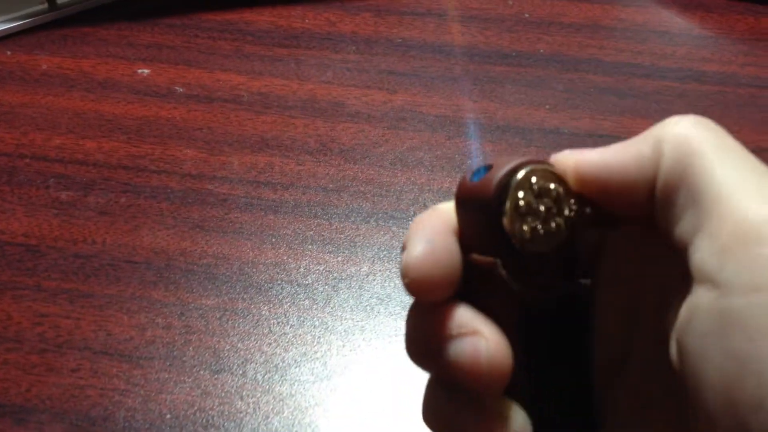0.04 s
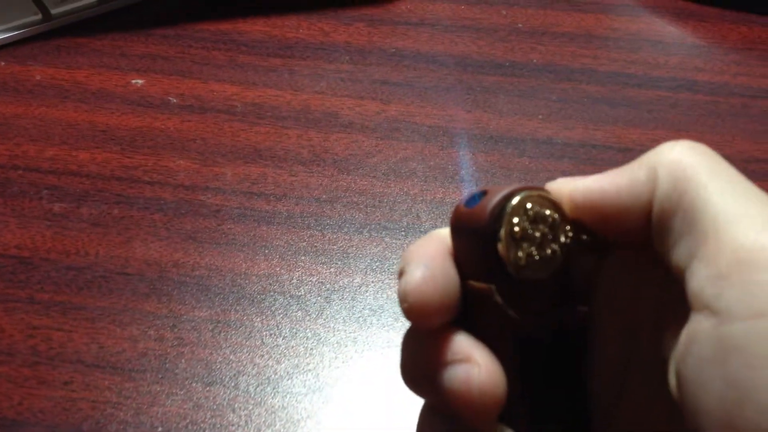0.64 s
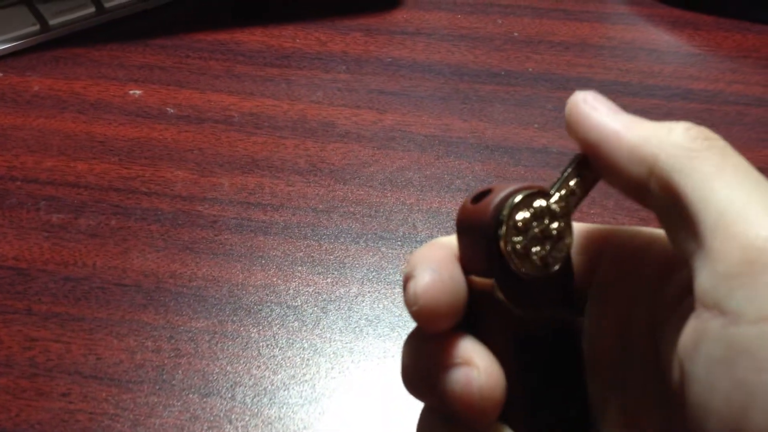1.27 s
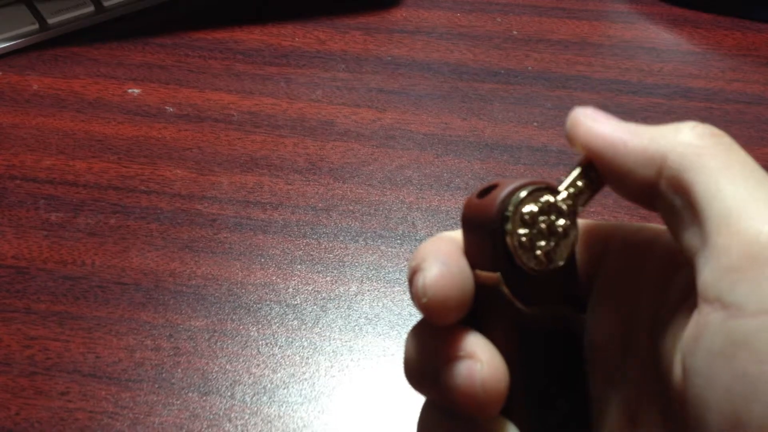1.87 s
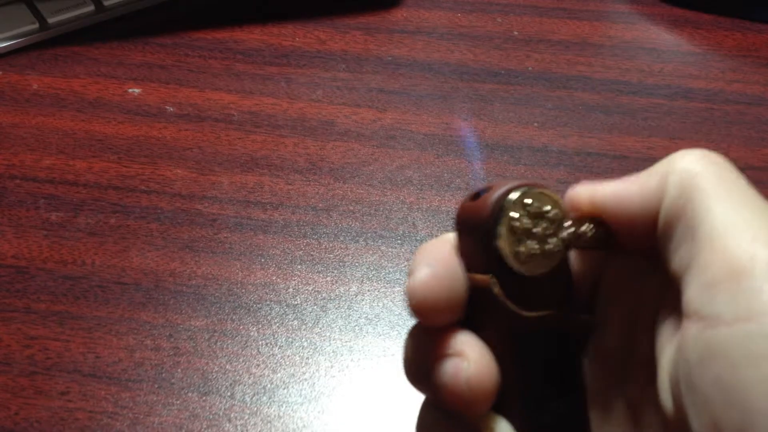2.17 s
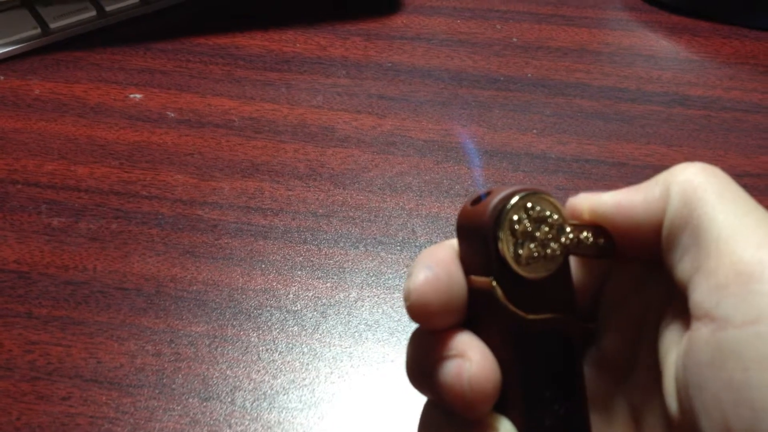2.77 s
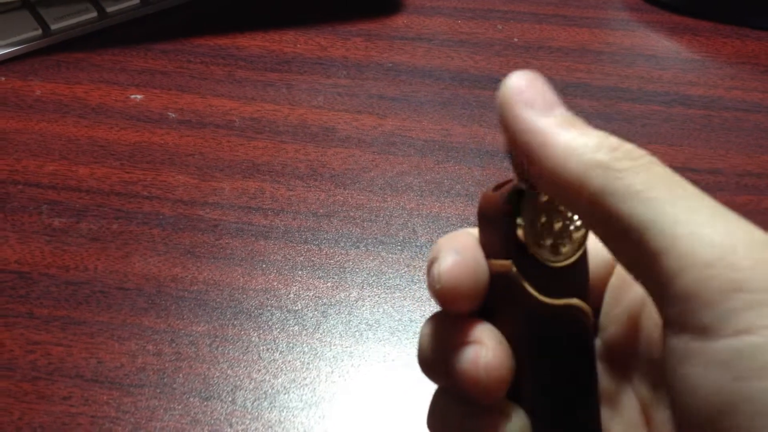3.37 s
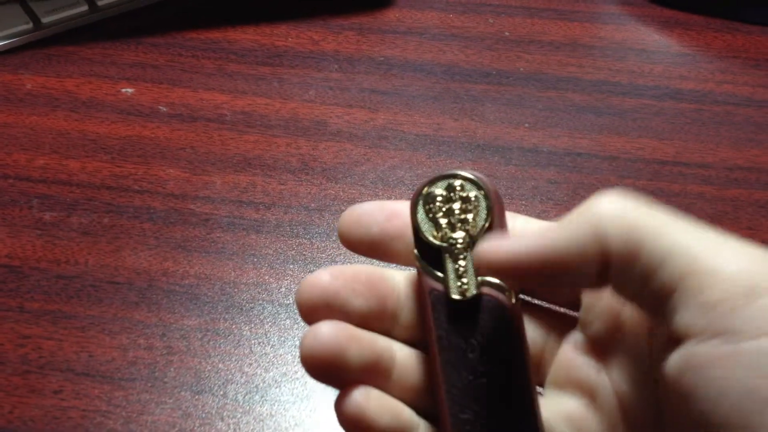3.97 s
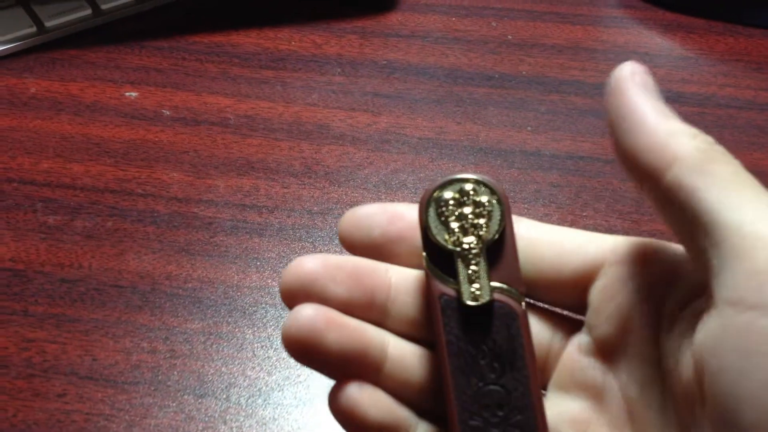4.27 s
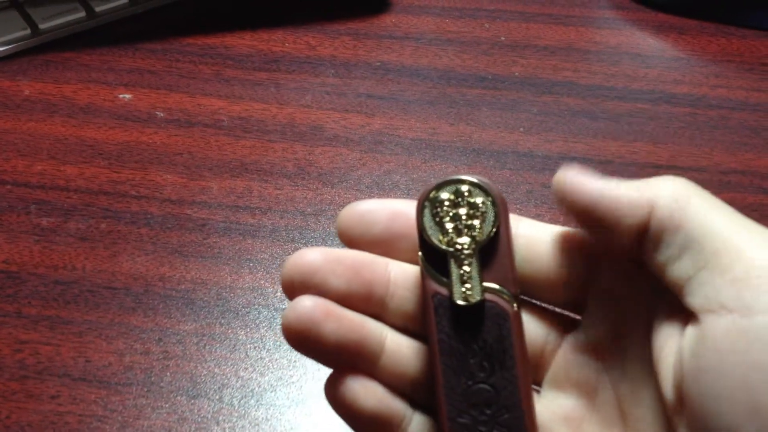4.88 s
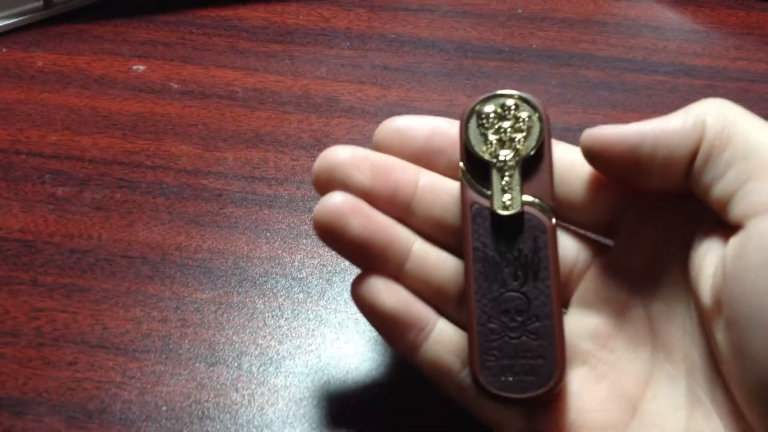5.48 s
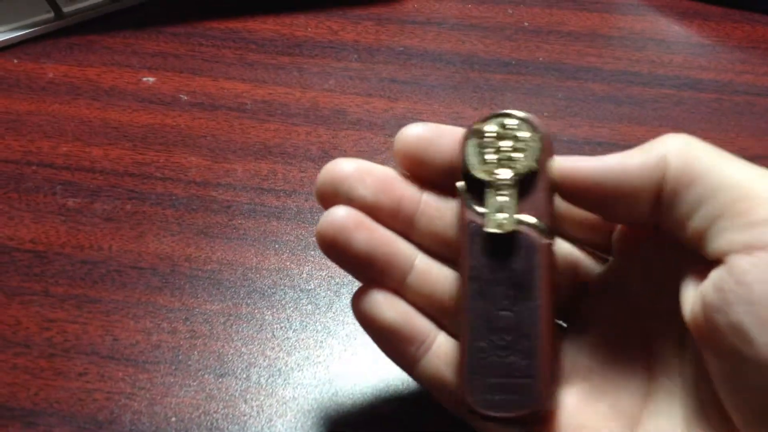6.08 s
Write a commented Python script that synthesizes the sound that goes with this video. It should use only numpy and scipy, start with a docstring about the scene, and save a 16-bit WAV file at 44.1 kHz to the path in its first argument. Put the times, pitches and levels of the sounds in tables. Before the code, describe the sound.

A jet lighter burns with a soft hissing roar, then cuts off with a few small ticks. After a pause, gas hisses briefly, the igniter snaps sharply and the flame returns, louder and slightly crackly. It stops again, and the metal lever ticks as it swings round and clicks shut. The microphone is close, in a small quiet room with faint ventilation noise and electrical hum.

```python
"""A jet-flame butane lighter, worked by hand above a desk in a small quiet room.
Turbulent burning roars and the nozzle hisses until the lever is let go and the valve shuts.
Pressed again, the pivot squeaks, gas hisses, the piezo striker snaps and the flame returns.
Then the metal lever is swung round and clicks shut, over faint ventilation noise and mains hum."""
import sys
import numpy as np
from scipy import signal
from scipy.fft import rfft, irfft
from scipy.io import wavfile
from scipy.ndimage import uniform_filter1d

SR = 44100
rng = np.random.default_rng(int(sys.argv[2]) if len(sys.argv) > 2 else 0)


def digitize_waveform(pressure):
    """Quantize a signal to 16-bit integers and store it at the path in sys.argv[1].

    Rows of a 2-D input are taken as channels; values are limited to [-1, 1].
    """
    field = np.atleast_2d(pressure).T
    bounded = np.clip(field, -1, 1)
    quanta = np.round(bounded * 32767).astype(np.int16)
    wavfile.write(sys.argv[1], SR, quanta)


N = 274743
TIME = np.arange(N) / SR
# burns: lit t/s, valve shut t/s, hot roar level/dB, hot hiss level/dB
BURNS = [(-.08, 0.928, -44.8, -50.5), (2.208, 3.022, -38, -41.5)]


def undb(db):
    """Decibels to gain."""
    return np.exp(np.asarray(db) * (np.log(10) / 20))


def unit(x):
    """Scale to rms 1."""
    return x / np.sqrt(np.mean(x ** 2))


def colour(x, points, bumps=(), size=8192):
    """Minimum-phase filter from points (f/Hz, level/dB) and bumps (f/Hz, width/Hz, lift/dB)."""
    hz, db = np.transpose(points)
    bins_hz = np.fft.rfftfreq(size, 1 / SR) + 1
    shape_db = np.interp(np.log(bins_hz), np.log(hz), db)
    for centre_hz, width_hz, lift_db in bumps:
        shape_db += lift_db * np.exp(-2 * ((bins_hz - centre_hz) / width_hz) ** 2)
    cepstrum = irfft(np.log(undb(shape_db)))
    cepstrum[1:size // 2] *= 2
    cepstrum[size // 2:] = 0
    return signal.oaconvolve(x, irfft(np.exp(rfft(cepstrum))))[:len(x)]


def walk(rate_hz):
    """Smooth random wander, rms 1."""
    hold = max(int(SR / rate_hz), 1)
    steps = np.repeat(rng.standard_normal(N // hold + 1), hold)
    return unit(uniform_filter1d(steps, hold)[:N])


def add(track, start_s, sound):
    """Mix a short sound in."""
    i = int(start_s * SR)
    track[i:i + len(sound)] += sound[:N - i]


def gate(start_s, stop_s, rise_s, fade_db_per_s):
    """Gain: rise, hold, fade."""
    rise = np.clip((TIME - start_s) / rise_s, 0, 1)
    return rise * undb(-fade_db_per_s * np.maximum(TIME - stop_s, 0))


def crackle(pops_per_s, spread_db):
    """Dense tiny pops of uneven size, rms 1."""
    pops = (rng.random(N) < pops_per_s / SR) * rng.choice([-1, 1], N)
    return unit(pops * undb(spread_db * np.minimum(rng.exponential(size=N), 3)))


def flame(burn, roar_colour, hiss_colour, roar_pops, hiss_pops, flutter_db, pops_per_s):
    """Turbulent roar and nozzle hiss share crackle and flutter, and build as the flame warms."""
    # roar bands lifted or cancelled by desk and walls: f/Hz, width/Hz, lift/dB
    desk = [(478, 30, 4), (721.5, 46, 1), (852, 63, 1), (991, 28, 5), (1130, 110, -1), (1273.4, 13, 5),
            (1340, 65, -1.5), (1930.5, 80, 0), (2820, 160, 0.5), (3180, 250, -4), (3550, 300, 1),
            (4960, 250, 5.5)]
    # narrow peaks and dips in the hiss: f/Hz, width/Hz, lift/dB
    hiss_ripple = [(6300, 200, -2.5), (7050, 245, 1.5), (8100, 180, -2), (10100, 400, -2.5),
                   (12450, 210, 1.5), (14050, 250, 2), (14600, 250, 2)]
    lit_s, shut_s, roar_db, hiss_db = burn
    warm_s, valve_close_s = 0.76, 0.011
    cold_db = 14 * np.exp(-np.maximum(TIME - lit_s, 0) / warm_s)
    cut_db = 8.5 * np.clip((TIME - shut_s) / valve_close_s, 0, 1)
    strength = gate(lit_s, shut_s, rise_s=0.018, fade_db_per_s=330) * undb(-cold_db - cut_db)
    pops = crackle(pops_per_s, spread_db=2.0)
    wander_db = flutter_db * walk(45)
    roar = unit(colour(rng.standard_normal(N) + roar_pops * pops, roar_colour, desk))
    hiss = unit(colour(rng.standard_normal(N) + hiss_pops * pops, hiss_colour, hiss_ripple))
    return strength * (roar * undb(roar_db + wander_db) + hiss * undb(hiss_db + .6 * wander_db))


def jet():
    """The jet burns twice, the second time louder and with more crackle."""
    # combustion roar and nozzle hiss spectra: f/Hz, level/dB
    first_roar = [(76, -48), (130, -17.5), (217, -0.5), (324, -7.5), (469, -4), (550, -6.5), (689, -4.5),
                  (1080, -10), (1250, -5), (1720, -3.5), (2150, 0.5), (3420, -4.5), (4350, -15.5),
                  (4950, -15.5), (6000, -24.5), (7800, -56), (13200, -120)]
    first_hiss = [(3530, -40), (6000, -8), (6240, -9), (6940, -6), (8290, -2.5), (9860, -5), (11700, 0),
                  (13200, -5), (14500, -1.5), (15400, -8)]
    second_roar = [(76, -55), (130, -26.5), (214, -2.5), (324, -7.5), (667, 1), (822, -5.5), (980, -3),
                   (1110, -9.5), (1250, -5), (1720, -6.5), (2150, -0.5), (2820, -2.5), (3710, -6),
                   (4420, -14), (6000, -18), (7800, -44.5), (13200, -120)]
    second_hiss = [(3530, -36), (6000, -7.5), (6420, -8), (6860, -1.5), (7570, -5.5), (8130, 0.5),
                   (9010, -0.5), (9560, -3), (10400, -11), (11300, -1), (11600, 0), (13300, -7),
                   (14800, -7.5), (15400, -12)]
    first = flame(BURNS[0], first_roar, first_hiss,
                  roar_pops=0.74, hiss_pops=0.51, flutter_db=1.2, pops_per_s=900)
    second = flame(BURNS[1], second_roar, second_hiss,
                   roar_pops=0.86, hiss_pops=1.7, flutter_db=0.9, pops_per_s=1300)
    return first + second


def background():
    """Ventilation noise with duct resonances; mains hum beats against a weaker tone close by."""
    # ventilation spectrum: f/Hz, level/dB
    air_colour = [(25, -6), (60, -11), (90, -15), (140, -9.5), (215, -2.5), (340, -9), (500, -11),
                  (800, -15.5), (1150, -16), (1800, -20), (4400, -22.5), (9700, -27.5), (12500, -26.5),
                  (15300, -24.5)]
    # background contour: t/s, level/dB
    contour = [(0, -73), (1.1, -70.5), (2.15, -68), (2.3, -75), (3.2, -71), (4.1, -69), (6.2, -68)]
    # duct resonances: f/Hz, width/Hz, lift/dB
    ducts = [(214, 50, 0.92), (490, 50, 2.7), (994.4, 40, 1.7)]
    hum_hz, beat_hz, crest_s = 120.7, .47, 1.66
    air = unit(colour(rng.standard_normal(N), air_colour, ducts))
    phase = 2 * np.pi * hum_hz * TIME
    beat_phase = 2 * np.pi * beat_hz * (TIME - crest_s)
    hum = unit(np.sin(phase) + undb(-3.5) * np.sin(phase - beat_phase))
    air_db = np.interp(TIME, *np.transpose(contour))
    return air * undb(air_db + .4 * walk(6)) + hum * undb(air_db - 7.2 + .7 * walk(4))


def contact(hz, db, tilt_db_per_oct, spot_hz, spot_db):
    """Spectrum of a blow: harder is brighter, and the spot struck favours one band."""
    ref_db, oct_per_db = -30, 0.01
    cutoff_hz = 11500 * 2 ** (oct_per_db * (db - ref_db))
    lift_db = spot_db * np.exp(-10 * np.log2(hz / spot_hz) ** 2)
    return undb(tilt_db_per_oct * np.log2(hz / 5000) + lift_db) / np.sqrt(1 + (hz / cutoff_hz) ** 10)


def clicks(blows, modes, scrape_db, scrape_s, spread_hz, attack_s):
    """Metal lands and rings briefly while the faces scrape to rest."""
    out, t = np.zeros(N), TIME[:SR // 8]
    hz, mode_db, t60_s = np.transpose(modes)[:, :, None]
    bins_hz = np.fft.rfftfreq(len(t), 1 / SR) + 1
    signs = (-1) ** np.arange(len(hz))[:, None]
    partials = signs * undb(-60 * t / t60_s) * np.sin(2 * np.pi * hz * t)
    # the scrape sounds through the same modes, broadened
    body = np.sqrt(np.sum(undb(mode_db) ** 2 / (1 + ((bins_hz - hz) / spread_hz) ** 4), axis=0))
    body *= np.minimum(bins_hz / hz[0], 1) ** 1.4
    for start_s, db, *timbre in blows:
        gain = undb(mode_db) * contact(hz, db, *timbre)
        ring = np.sum(gain * partials, axis=0) / np.sqrt(np.sum(gain ** 2))
        grit = irfft(rfft(rng.standard_normal(len(t))) * contact(bins_hz, db, *timbre) * body, len(t))
        scrape = undb(scrape_db) * unit(grit) * np.exp(-t / scrape_s)
        click = (ring + scrape) * (1 - np.exp(-t / attack_s))
        add(out, start_s, undb(db) * click / np.sqrt(np.sum(click ** 2) / 10))
    return out


def striker():
    """Valve parts tick and the piezo striker snaps."""
    # blows: t/s, level/dB, tilt/(dB/oct), spot f/Hz, spot lift/dB
    blows = [(.7405, -30.5, -0.5, 8700, 1), (.7843, -26, 3.5, 8400, 4), (.9782, -25, -3.5, 4400, 5),
             (.9922, -35, -2.5, 4200, 13), (1.0022, -52, 1, 4200, 10), (1.929, -55, -12, 3100, 6),
             (2.204, -2.9, 0, 6200, 2.5), (2.8838, -29, -3, 9500, 8), (3.064, -31.5, -4, 8250, 3),
             (3.1328, -47.5, 2.5, 3650, 10), (3.195, -58.5, 6, 8940, 5)]
    # valve and striker modes: f/Hz, level/dB, t60/s
    modes = [(2470, -3, 0.011), (2720, -2, .012), (3470, -19, 0.011), (4066, -14.5, 0.0087),
             (5400, -12, 0.0089), (7080, -5, 0.01), (7800, -5, 0.0096), (8585, -6.5, 0.0097),
             (9884, .5, 0.0057), (11770, 0.5, .007), (12700, -4.5, .008), (13620, -5.5, .008),
             (14580, -1, .009)]
    return clicks(blows, modes, scrape_db=-5.5, scrape_s=.0014, spread_hz=370, attack_s=.0002)


def sputters():
    """Single larger pops in the flame."""
    # pops: t/s, peak level/dB
    pops = [(0.776, -32), (0.781, -28.5), (0.8322, -30), (2.335, -33), (2.966, -32), (2.993, -30)]
    kicks = np.zeros(N)
    for start_s, db in pops:
        add(kicks, start_s, undb([db]))
    pop = colour(signal.unit_impulse(SR // 100), [(150, 0), (2700, 9), (5500, -1), (15000, -29)])
    return signal.fftconvolve(kicks, pop / np.abs(pop).max())[:N]


def thumps():
    """Short low thumps under flame pops, the snap and handling."""
    # thumps: t/s, level/dB, f/Hz, t60/s
    low_thumps = [(.782, -44.5, 265, .04), (.832, -41, 296, 0.021), (0.998, -56, 234, 0.054),
                  (1.07, -61.5, 230, .06), (2.204, -22.5, 222, .017), (3.779, -46, 260, 0.021)]
    out, t = np.zeros(N), TIME[:SR // 8]
    attack = 1 - np.exp(-t / .0003)
    for start_s, db, hz, t60_s in low_thumps:
        add(out, start_s, undb(db - 60 * t / t60_s) * np.cos(2 * np.pi * hz * t) * attack)
    return out


def gas():
    """Unlit gas hisses from valve opening to spark, and sighs out duller after each shut-off."""
    # hiss and sigh spectra: f/Hz, level/dB
    hiss_colour = [(900, -27), (1500, -9.5), (2900, -12), (4100, -16), (5600, -26.5), (6700, -15),
                   (7800, -12.5), (8400, -4.5), (9800, 0), (10600, -11.5), (11600, -1), (13200, -8),
                   (15300, -4.5)]
    sigh_colour = [(200, -14), (700, -9), (1500, -5), (2300, -1.5), (3500, -5.5), (5500, -17), (14000, -23)]
    open_s, spark_s = 2.056, BURNS[-1][0]
    flow = gate(open_s, spark_s, rise_s=.032, fade_db_per_s=1200)
    drain = sum(gate(shut_s, shut_s + 0.044, rise_s=.012, fade_db_per_s=500) for _, shut_s, *_ in BURNS)
    hiss = unit(colour(rng.standard_normal(N), hiss_colour)) * undb(-44.9) * flow
    sigh = unit(colour(rng.standard_normal(N), sigh_colour)) * undb(-55) * drain
    return hiss + sigh


def squeak():
    """The pivot squeaks faintly under the thumb, swelling and fading as its pitch sags."""
    start_s, length_s, start_hz, sag_hz_per_s = 1.975, .14, 600, 220
    age_s = np.clip(TIME - start_s, 0, length_s)
    hz = (start_hz - sag_hz_per_s * age_s) * (1 + .008 * walk(80))
    tone = unit(np.sin(2 * np.pi * np.cumsum(hz) / SR))
    return tone * undb(-68) * np.sin(np.pi * age_s / length_s)


def lever():
    """The metal lever ticks as it swings round, then clicks shut."""
    # blows: t/s, level/dB, tilt/(dB/oct), spot f/Hz, spot lift/dB
    blows = [(3.5128, -35.5, -4, 3000, 11), (3.5224, -38, -3.5, 2800, 12), (3.6092, -48, -6, 3300, 0),
             (3.6192, -38.5, -3.5, 3400, 5.5), (3.6558, -43, -2.5, 3800, 2), (3.6957, -51, 1, 8000, 4),
             (3.7945, -20.5, 0, 9800, 5.5)]
    # lever modes: f/Hz, level/dB, t60/s
    modes = [(2020, -17.5, 0.008), (2500, -8.5, 0.025), (3060, -11, .026), (3900, -14, 0.05),
             (4280, -6.5, 0.014), (5100, -18, .012), (6300, -7, 0.022), (7060, -18, 0.011),
             (7870, -9, 0.0084), (9600, -2, 0.0043), (10470, -4, 0.011), (12300, -9, 0.0045),
             (14200, -10, .0045)]
    return clicks(blows, modes, scrape_db=1, scrape_s=.0019, spread_hz=390, attack_s=0.00014)


def room(x, t60_s, tail_db):
    """A few near reflections and a short tail, coloured by the walls."""
    # first reflections: delay t/s, level/dB
    echoes = [(.0041, -19.5), (.0098, -15.5), (0.0248, -24.5), (.028, -25.5)]
    # wall return spectrum: f/Hz, level/dB
    walls = [(150, -6), (2800, -2), (4500, 4.5), (8000, -6.5), (15000, -7.5)]
    t, build_s = TIME[:SR // 2], 0.0069
    response = rng.standard_normal(len(t)) * undb(-60 * t / t60_s) * (1 - np.exp(-t / build_s))
    response *= undb(tail_db) / np.sqrt(np.sum(response ** 2))
    for delay_s, db in echoes:
        add(response, delay_s, undb([db]))
    return colour(signal.fftconvolve(x, response)[:N], walls)


def scene():
    """The lighter close by, its room and the background; mono."""
    flames, snaps, latch = jet(), striker(), lever()
    near = flames + snaps + sputters() + thumps() + gas() + squeak()
    reverb = room(near, t60_s=0.16, tail_db=-15) + room(latch, t60_s=0.17, tail_db=-11)
    return (near + latch + reverb + background())[None]


def record(dry):
    """The microphone drops the deep bass and the very top."""
    bass_hz, top_hz = 105, 15400
    bass_cut = signal.butter(4, bass_hz, "high", fs=SR, output="sos")
    top_cut = signal.ellip(10, .2, 70, top_hz, fs=SR, output="sos")
    return signal.sosfilt(top_cut, signal.sosfilt(bass_cut, dry))


dry = scene()
out = record(dry)
digitize_waveform(out)
```